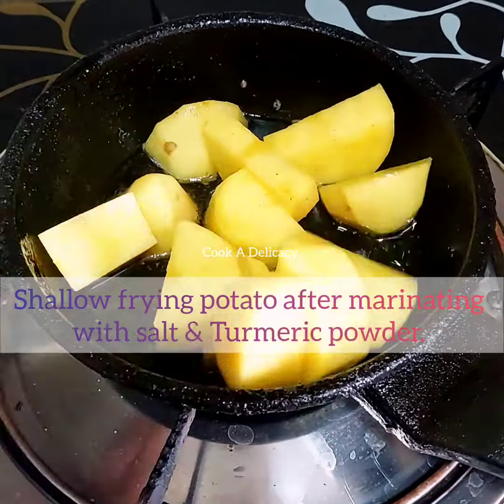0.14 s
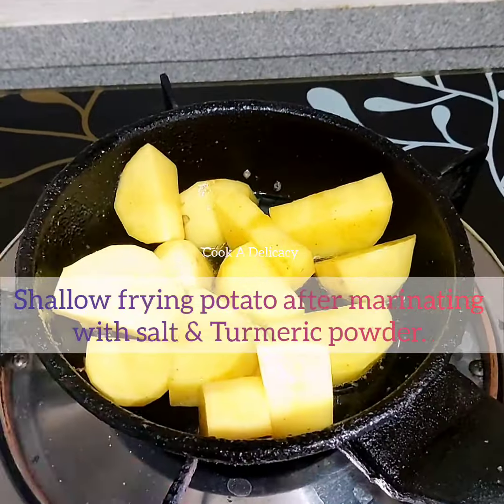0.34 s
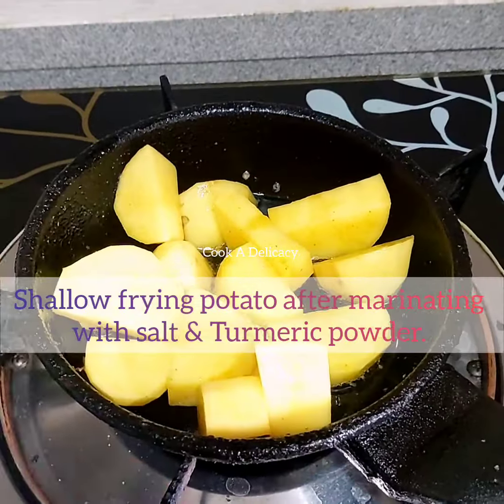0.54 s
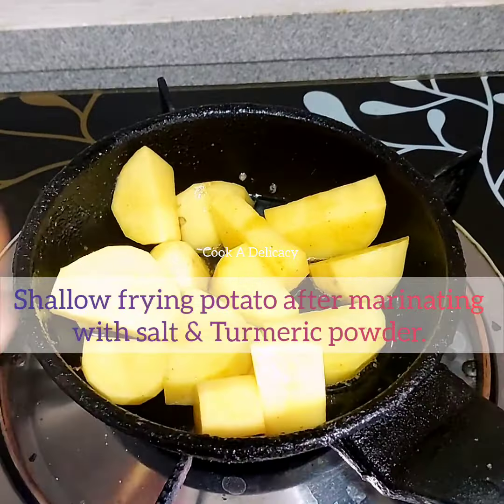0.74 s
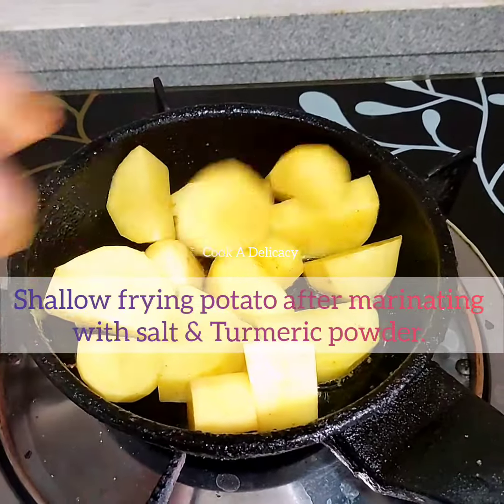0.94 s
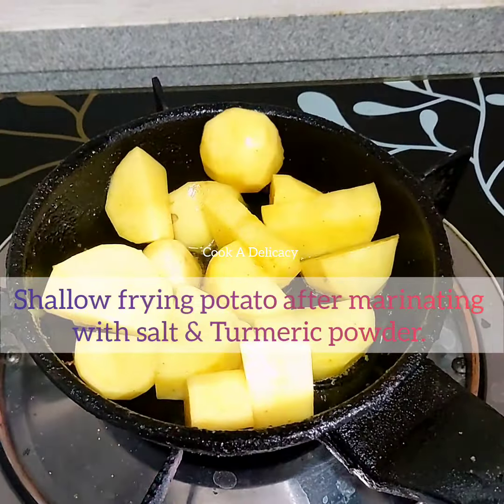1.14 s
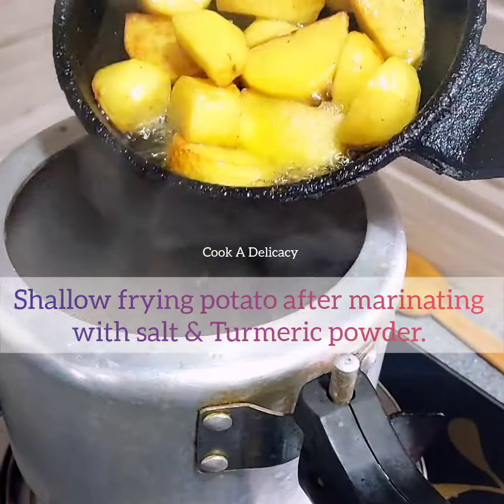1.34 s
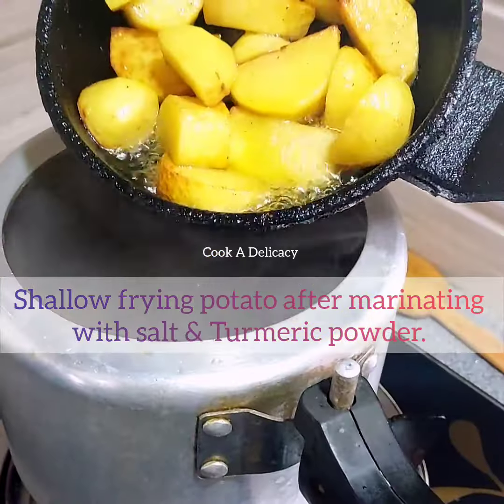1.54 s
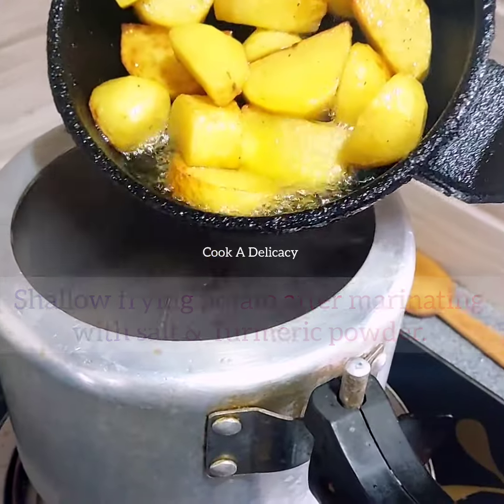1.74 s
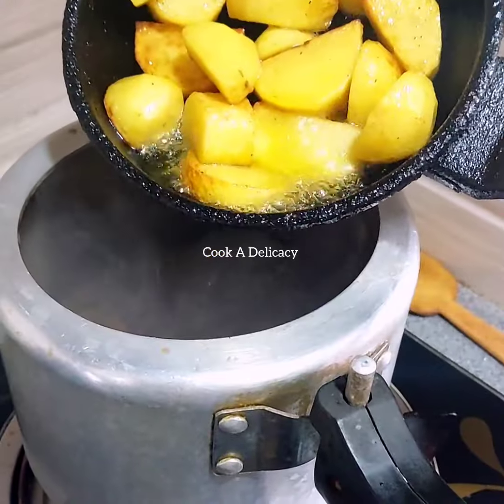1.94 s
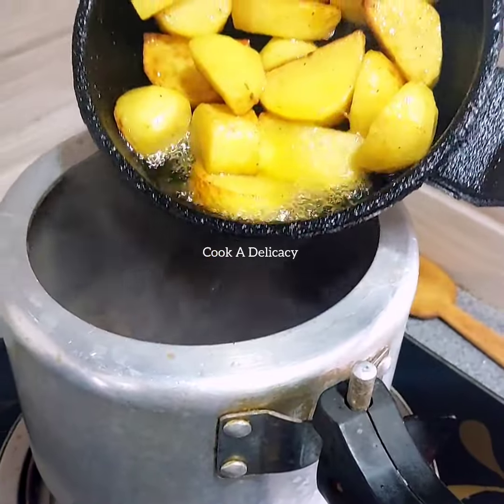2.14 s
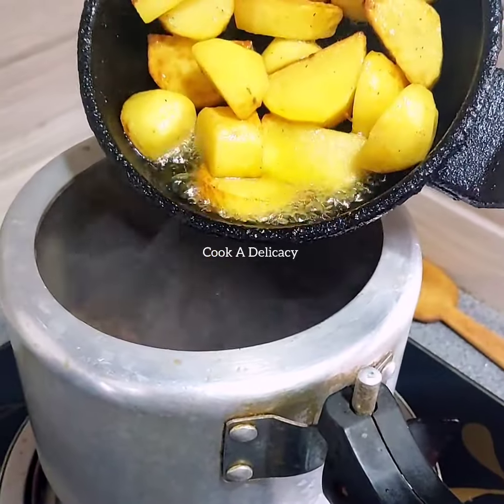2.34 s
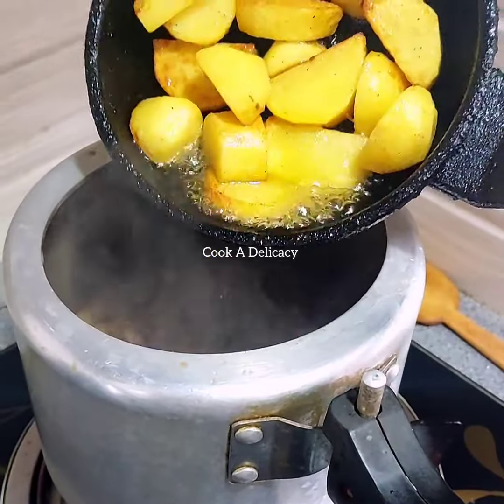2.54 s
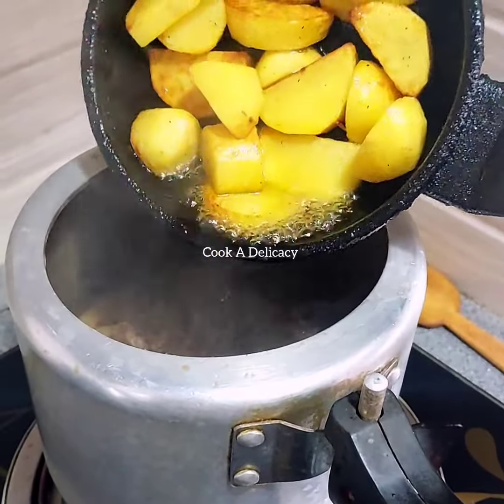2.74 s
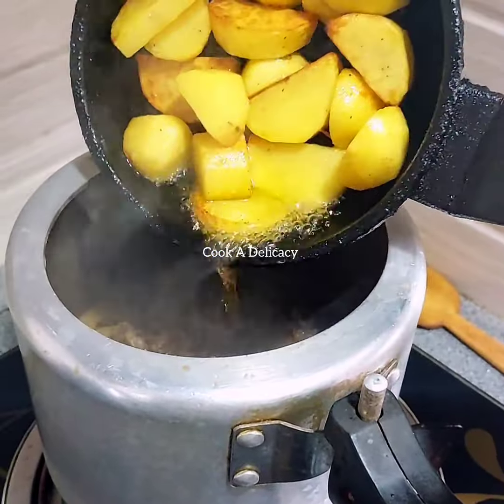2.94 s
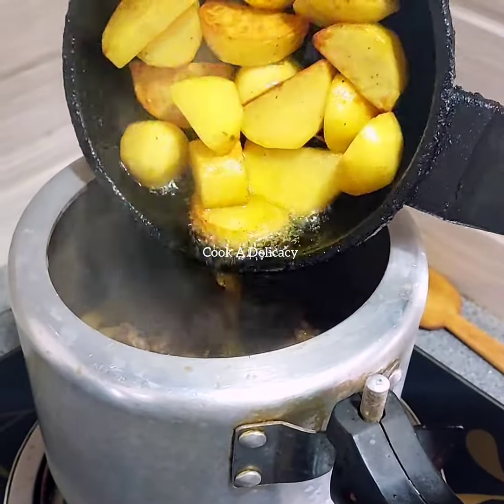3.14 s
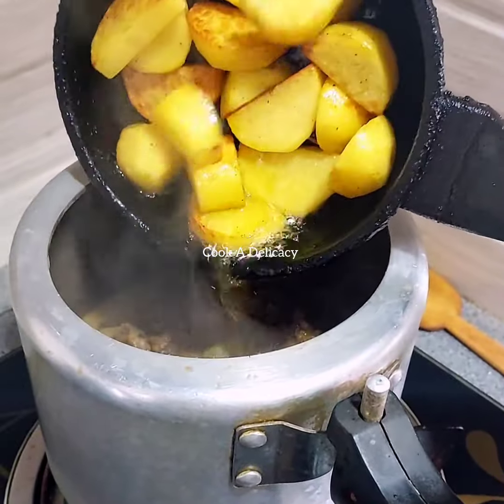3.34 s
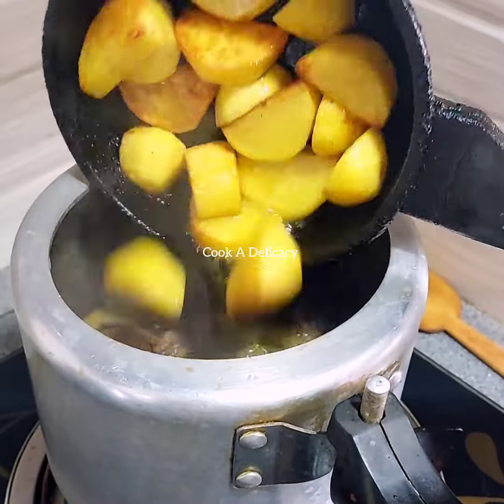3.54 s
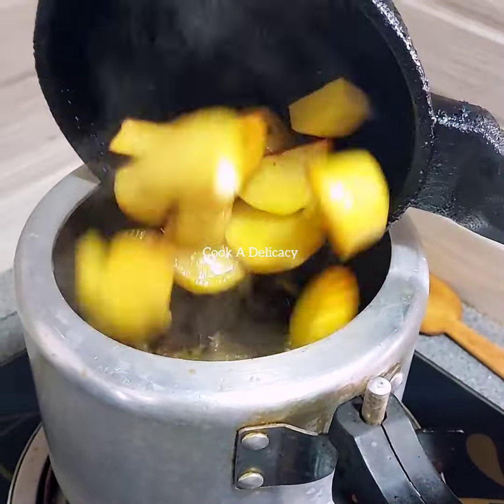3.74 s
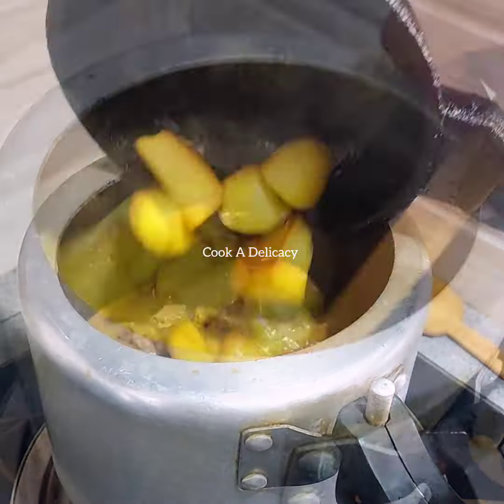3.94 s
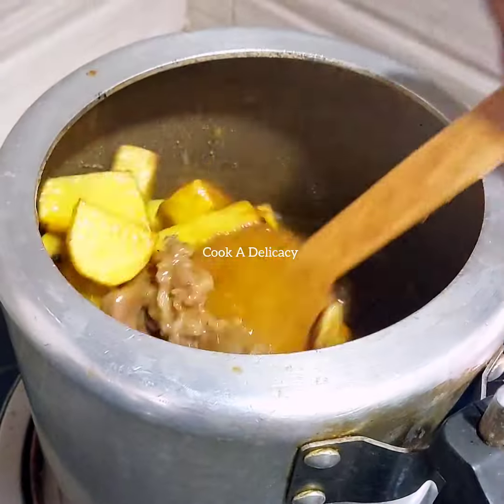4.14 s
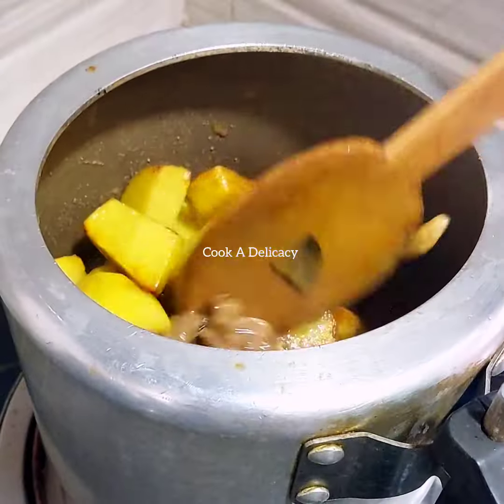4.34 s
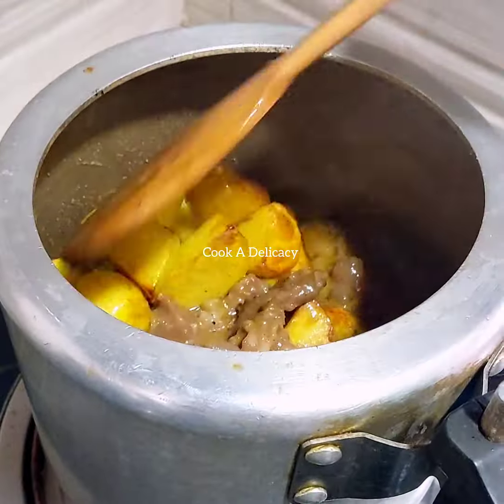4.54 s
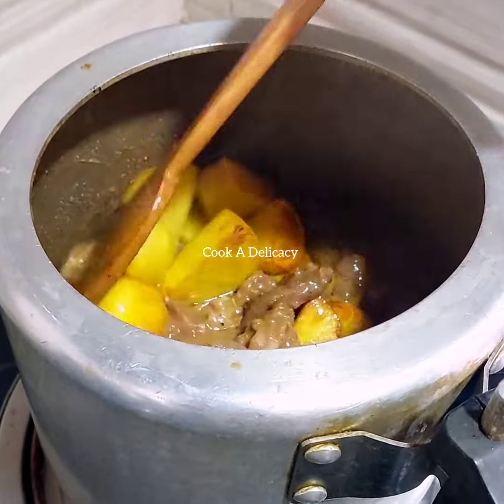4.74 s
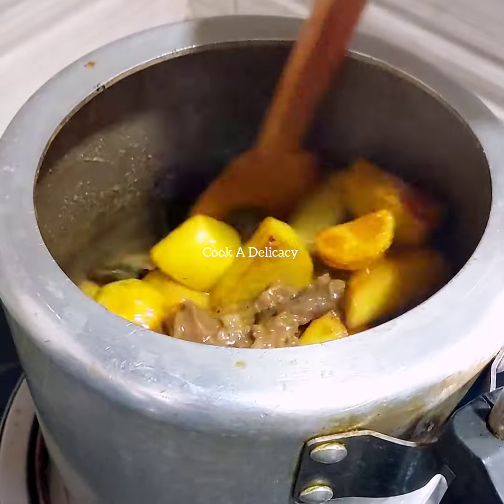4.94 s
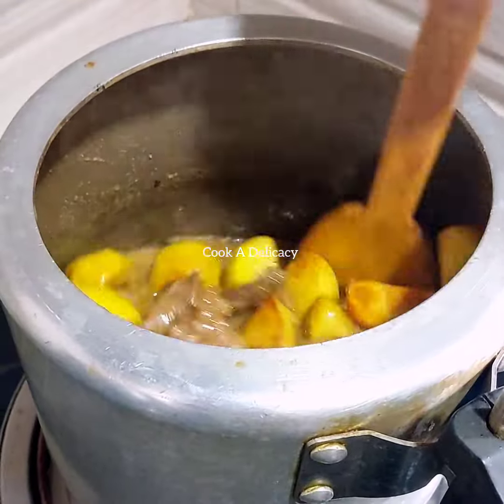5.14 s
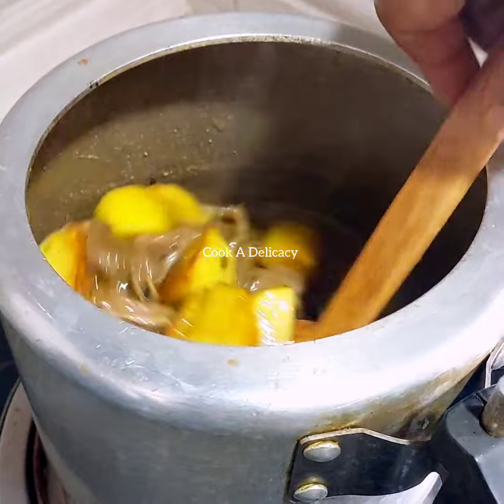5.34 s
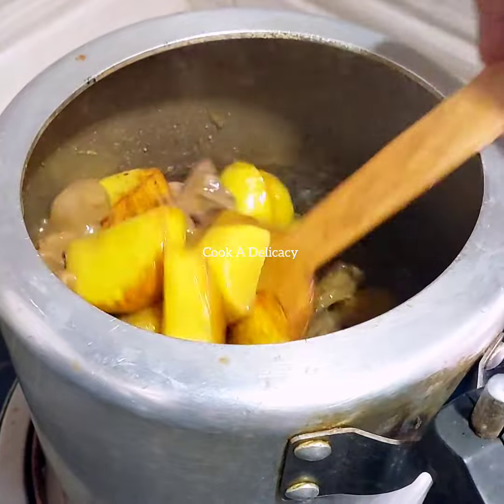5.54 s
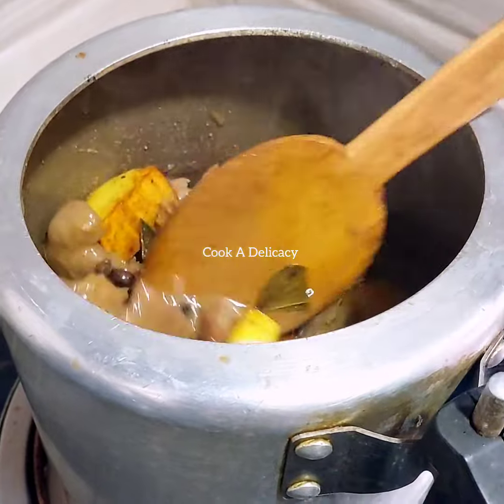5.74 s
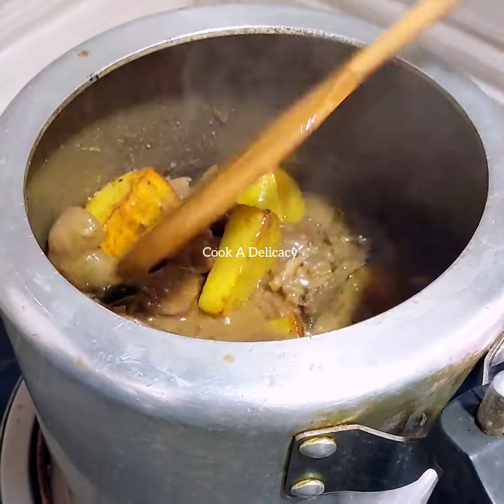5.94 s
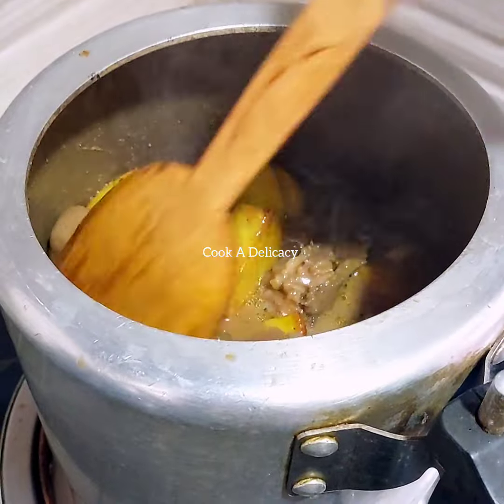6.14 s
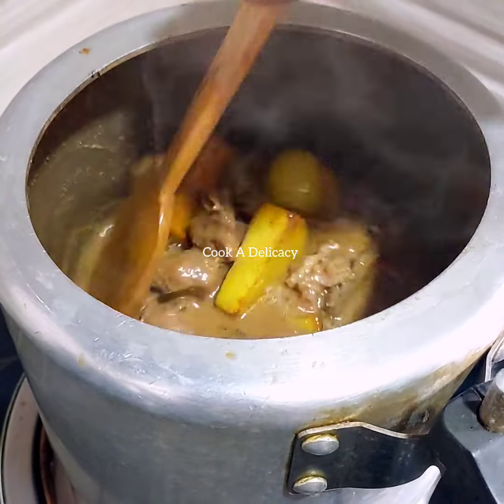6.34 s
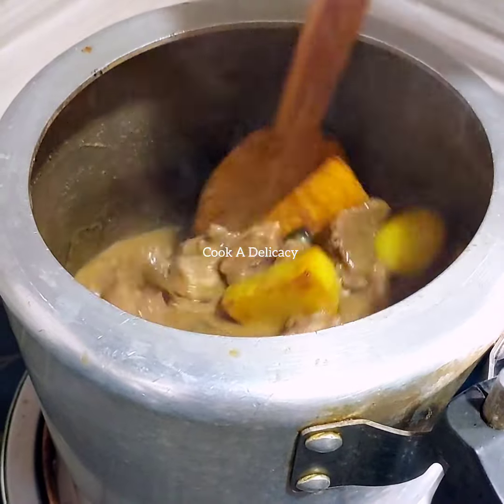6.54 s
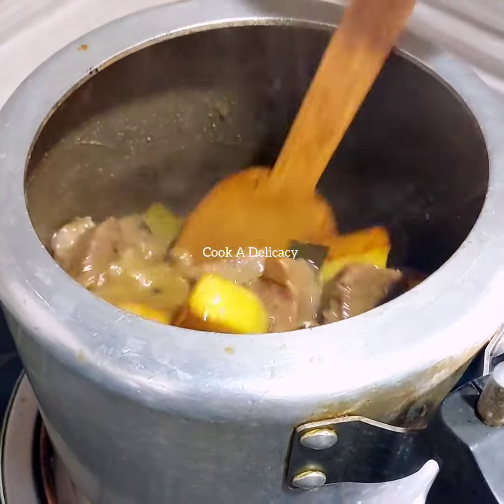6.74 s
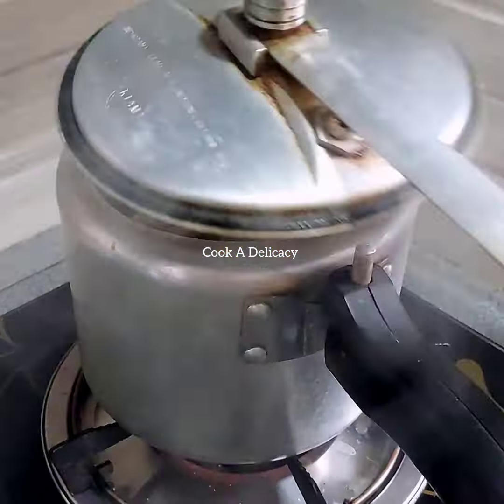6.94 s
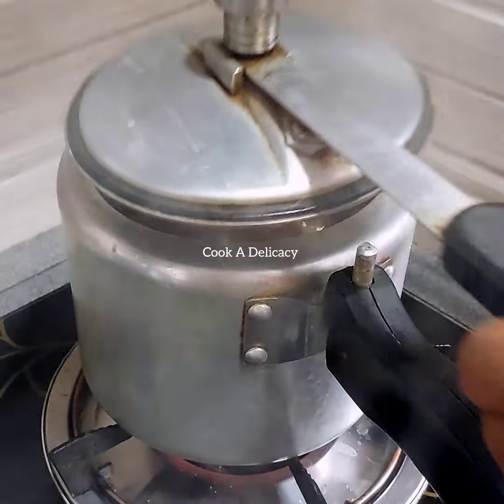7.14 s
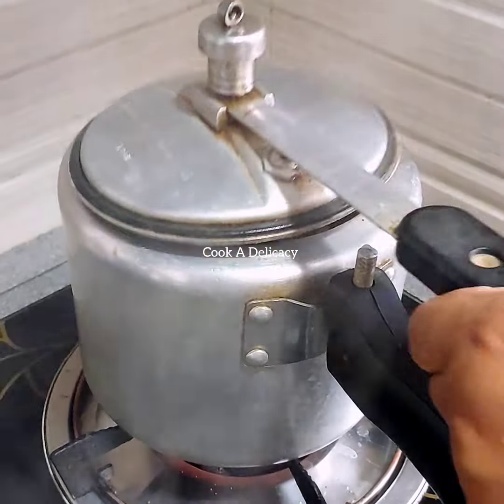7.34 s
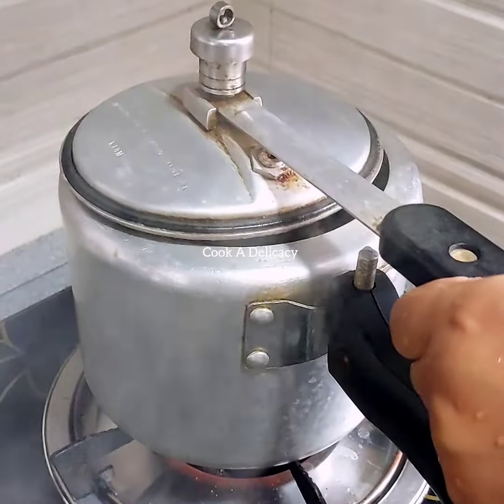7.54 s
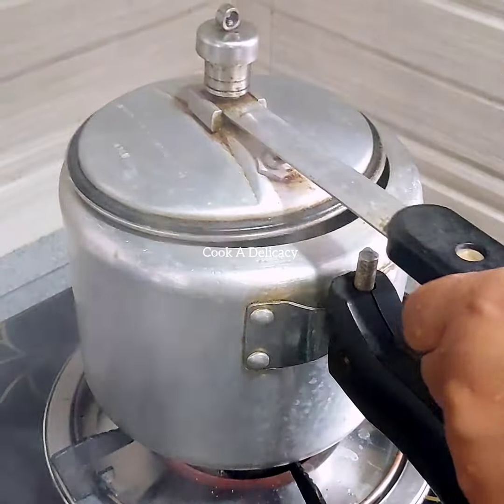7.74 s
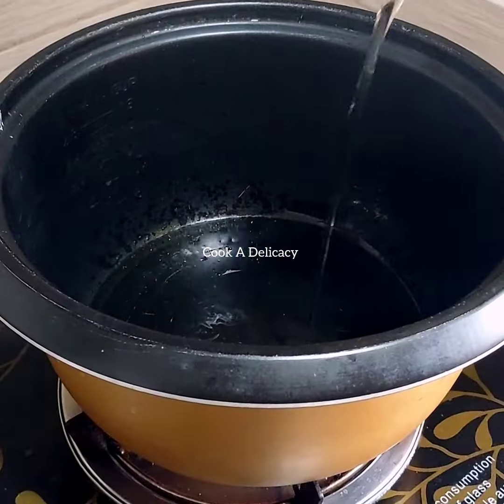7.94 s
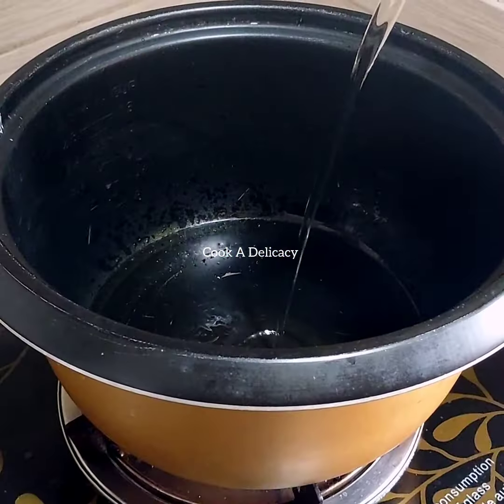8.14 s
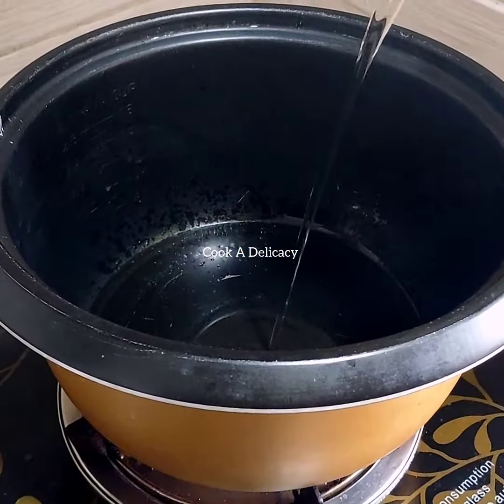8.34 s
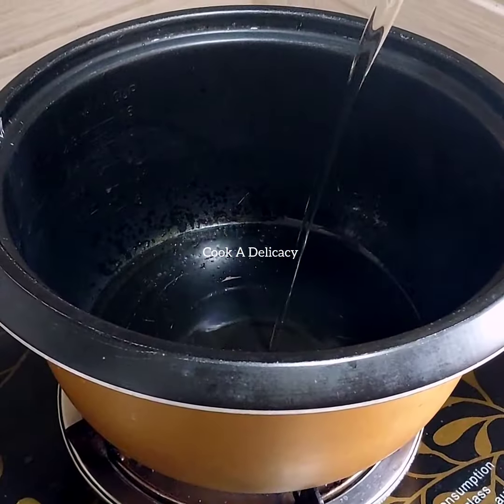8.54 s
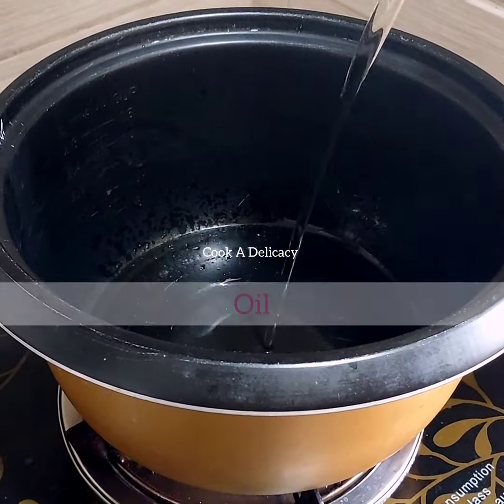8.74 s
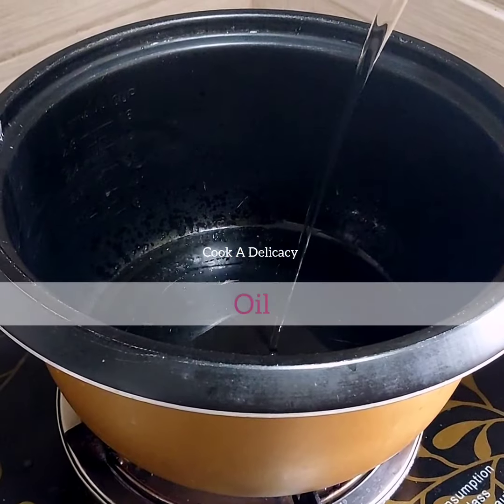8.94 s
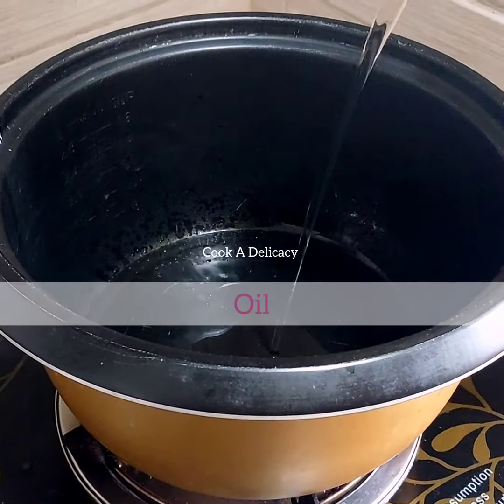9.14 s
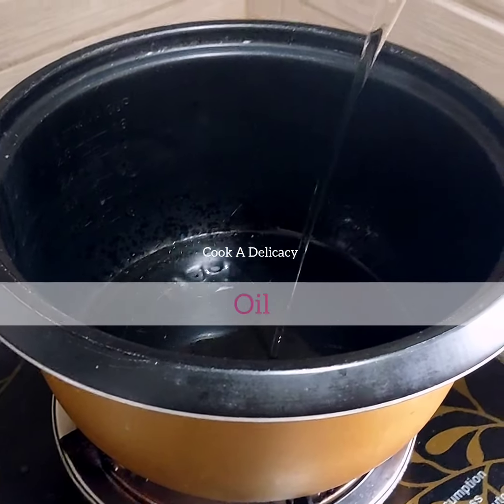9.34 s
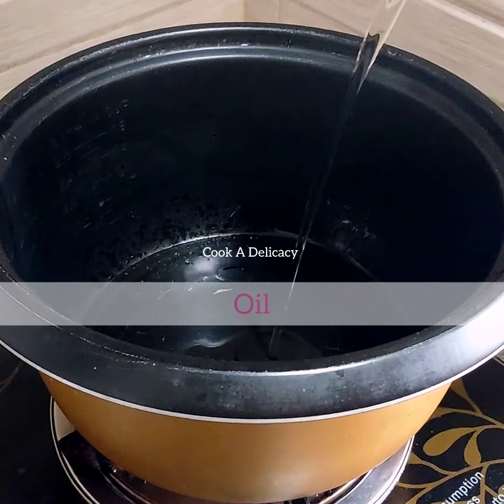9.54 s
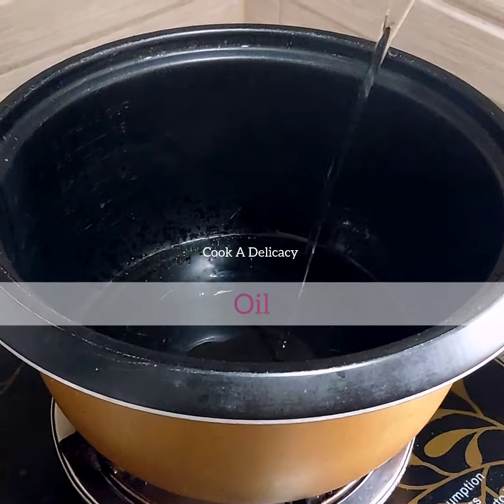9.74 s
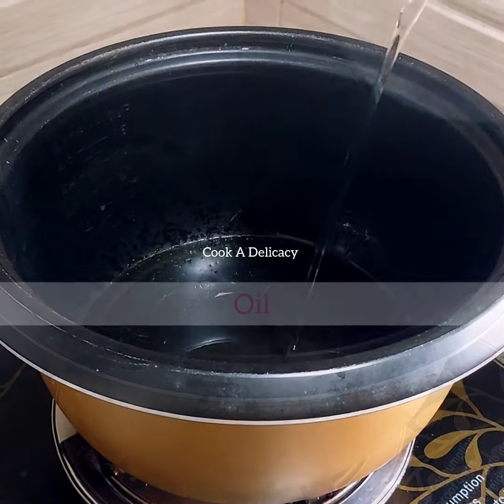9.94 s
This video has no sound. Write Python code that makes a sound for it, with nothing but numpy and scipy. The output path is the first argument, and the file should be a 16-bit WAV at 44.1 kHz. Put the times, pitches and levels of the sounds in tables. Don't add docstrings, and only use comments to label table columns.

```python
import sys
import numpy as np
from scipy import signal
from scipy.fft import rfft, irfft
from scipy.io import wavfile
from scipy.ndimage import uniform_filter1d

SR = 44100
rng = np.random.default_rng(int(sys.argv[2]) if len(sys.argv) > 2 else 0)


def int16_out(signal):
    q = np.round(np.clip(np.atleast_2d(signal).T, -1, 1) * 32767)
    wavfile.write(sys.argv[1], SR, q.astype(np.int16))


def invert_db(level):
    return 10 ** (np.asarray(level, dtype=float) / 20)


N = 440559
TIME = np.arange(N) / SR
PORT_LAG_S, FAN_LAG_S = .00049, .00026


def unit(x):
    return x / np.sqrt(np.mean(x ** 2))


def colour(x, tone):
    hz, db = np.transpose(tone)
    f = np.clip(np.arange(N // 2 + 1) * SR / N, 1, 15000)
    gain = invert_db(np.interp(np.log(f), np.log(hz), db))
    return unit(irfft(rfft(x) * gain, N))


def ring(x, hz, width_hz):
    hz = min(hz, SR / 2.3)
    b, a = signal.iirpeak(hz, hz / width_hz, SR)
    return signal.lfilter(b, a, x)


def walk(rate_hz):
    hold = int(SR / rate_hz)
    steps = np.repeat(rng.standard_normal(N // hold + 1), hold)
    return unit(uniform_filter1d(steps, hold)[:N])


def level_curve(table):
    rows = np.array(table)
    return np.interp(TIME, rows[:, 0], rows[:, 1], -200, -200)


def pan_gain(pan_db):
    return invert_db(np.array([[pan_db], [-pan_db]]) / 2)


def add(out, start_s, burst, pan_db):
    i = int(start_s * SR)
    out[:, i:i + burst.shape[1]] += (burst * pan_gain(pan_db))[:, :N - i]


def two_ports(count, alike_hz, lag_s):
    both = rng.standard_normal(count)
    own = rng.standard_normal((2, count))
    both = np.array([both, np.roll(both, int(lag_s * SR))])
    b, a = signal.butter(1, alike_hz, fs=SR)
    return own + signal.lfilter(b, a, both - 0.67 * own)


def frying(table, tone, lag_s, spread_db, flicker_db, pan_db, body=(), body_db=0, treble_db=(0, 0)):
    size = np.minimum(uniform_filter1d(rng.exponential(size=N), 4), 3.2)
    size = invert_db(spread_db * size + flicker_db * walk(25))
    start_s, end_s = table[0][0], table[-1][0]
    i, j = int(start_s * SR), int(end_s * SR) + 1
    steam = (two_ports(N, 1700, lag_s) * size)[:, i:j]
    if body:
        vessel = 0
        for hz, width_hz, db in body:
            flutter_db = 2.5 * walk(18)[i:j]
            vessel = vessel + invert_db(db + flutter_db) * ring(steam, hz, width_hz)
        steam = unit(steam) + invert_db(body_db) * unit(vessel)
    padded = np.pad(steam, ((0, 0), (i, N - i - steam.shape[1])))
    oil = colour(padded, tone) * np.sqrt((j - i) / N)
    treble = oil - uniform_filter1d(oil, 4)
    lift = invert_db(np.interp(TIME, [start_s, end_s], treble_db))
    oil = oil + (lift - 1) * treble
    return oil * invert_db(level_curve(table)) * pan_gain(pan_db)


def pops(table, ragged_db, rise_s, snap_db, order=3, streak_count=0):
    out, t = np.zeros((2, N)), TIME[:SR // 6]
    for start_s, db, hz, t60_s, share, pan_db in table:
        ragged = invert_db(ragged_db * np.repeat(rng.standard_normal(len(t) // 105), 105))
        puff_shape = ragged * np.minimum(t / rise_s, 1) * invert_db(-60 * t / max(t60_s, .004))
        snap_shape = invert_db(snap_db - 60 * t / 0.0011)
        edge = 1 + np.clip(share, .03, 2.5) / 2
        limits_hz = [hz / edge, min(hz * edge, SR / 2.4)]
        band = signal.butter(order, limits_hz, "band", fs=SR, output="sos")
        noise = two_ports(len(t), 2700, PORT_LAG_S)
        puff = signal.sosfilt(band, noise * (puff_shape + snap_shape))
        if streak_count:
            places = rng.uniform(-1.3, 1.3, streak_count)
            streaks = sum(ring(puff, hz * edge ** u, 70) for u in places)
            puff = unit(puff) + invert_db(3) * unit(streaks)
        add(out, start_s, puff * invert_db(db) / np.abs(puff).max(), pan_db)
    return out


def wet_pops(rows):
    return pops(rows, ragged_db=1.5, rise_s=0.00049, snap_db=2)


def dull_pops(rows):
    return pops(rows, ragged_db=-3.0, rise_s=0.00028, snap_db=18.0)


# time_s, level_db
FAN_LEVEL = [
    [(0, -43.5), (1.45, -41), (1.52, -42.5), (4.2, -43), (6.96, -43.5)],
    [(7.78, -44), (9, -46), (9.99, -45)],
]
# freq_hz, level_db
FAN_SPECTRUM = [(15, -63.5), (40, -18.5), (60, -16.5), (92, -3), (130, -15), (185, -22), (270, -10),
                (400, -16), (900, -21), (1300, -21), (2050, -23.5), (3800, -38), (5600, -43), (16000, -41)]


def fan():
    air = two_ports(N, 1000, FAN_LAG_S)
    whistle = ring(air, 5300, 350)
    air = colour(air + invert_db(4.0) * whistle, FAN_SPECTRUM)
    level_db = np.maximum(level_curve(FAN_LEVEL[0]), level_curve(FAN_LEVEL[1]))
    return air * invert_db(level_db + 1.3 * walk(7.6))


# time_s, level_db
FRY_LEVEL = [(0, -43), (.2, -46.5), (.36, -43), (.95, -43.5), (1.4, -42.5), (1.487, -43)]
# freq_hz, level_db
FRY_SPECTRUM = [(290, -47), (500, -9), (1230, -7), (1340, -9.5), (2260, 0), (2570, -2), (5240, -8.5),
                (8960, -17.5), (12000, -17.5), (16000, -25)]


def pan_frying():
    return frying(FRY_LEVEL, FRY_SPECTRUM, FAN_LAG_S, spread_db=6.5, flicker_db=.8, pan_db=1.0,
                  treble_db=(8, 8))


# start_s, peak_db, pitch_hz
FOOD_THUMPS = [(0.034, -26.5, 335), (.042, -26.5, 228), (.062, -27, 260), (.085, -34, 600),
               (0.906, -27.5, 476), (0.918, -25.5, 300), (.974, -27.5, 403), (1.0, -32, 267),
               (1.082, -26.5, 303), (1.1, -31.5, 496)]


def food_thumps():
    return dull_pops([(*row, .18, 1.3, .6) for row in FOOD_THUMPS])


# start_s, peak_db
PAN_TICKS = [(.1166, -18.5), (.1426, -21), (0.295, -14.5), (0.373, -21), (0.434, -16), (0.5775, -24),
             (.7946, -26), (0.906, -19), (0.92, -9), (0.9776, -16.5), (1.3034, -17), (1.417, -15),
             (5.098, -25), (5.2692, -22), (5.3932, -21.5), (5.4294, -25), (5.4892, -23), (5.695, -29.5)]
# start_s, peak_db
ROAR_CRACKLES = [
    (3.2117, -13),
    (3.2598, -1),
    (3.6691, -13.5),
]
# start_s, peak_db
BOWL_OIL_TICKS = [(7.788, -16), (7.8104, -24), (7.8536, -8.5), (7.793, -24), (7.8193, -8.5), (7.845, -17),
                  (7.867, -20), (7.883, -13.5), (7.887, -6.5), (7.911, -18), (7.927, -21), (7.959, -21.5),
                  (7.988, -19.5), (8.0, -28), (8.038, -21), (8.052, -15.5), (8.1362, -13), (8.204, -22),
                  (8.211, -21), (8.248, -20.5), (8.349, -13.5), (8.514, -32), (8.721, -17), (9.02, -16),
                  (9.111, -16), (9.168, -29), (9.2226, -33), (9.236, -32), (9.329, -21), (7.981, -20),
                  (8.009, -11), (8.014, -9.5), (8.075, -12), (8.107, -15), (8.115, -14.5), (8.1793, -14),
                  (8.231, -9.5), (8.2818, -12), (8.317, -9.5), (8.368, -10.5), (8.4173, -9.5),
                  (8.463, -4.5), (8.5842, -12), (8.635, -11), (8.7347, -11.5), (8.758, -9), (8.817, -10.5),
                  (8.8795, -13), (8.936, -9), (8.9773, -14.5), (9.0334, -7), (9.132, -14), (9.276, -28),
                  (9.4452, -21), (9.6774, -22), (9.8536, -21.5), (9.898, -24)]


def oil_ticks():
    events = PAN_TICKS + BOWL_OIL_TICKS + ROAR_CRACKLES
    rows = [(start_s, db, 11500, .011, 1.4, 4.0) for start_s, db in events]
    return pops(rows, ragged_db=4.0, rise_s=.0003, snap_db=4.0)


# start_s, peak_db, pitch_hz, width_share
PAN_BUBBLES = [(0.297, -27, 5040, 1.2), (.3117, -27, 5210, 1.6), (0.373, -30, 2240, .9),
               (0.488, -22.5, 3700, 0.31), (.4877, -27, 2300, 0.69), (0.5782, -16.5, 3260, 1.8),
               (.6463, -24.5, 2600, 1.05), (0.6602, -24, 2300, 0.94), (0.701, -22, 4360, 0.91),
               (0.724, -27, 5070, 0.35), (0.723, -25, 2400, 0.74), (.74, -29, 3100, .4),
               (0.9032, -21.5, 1800, 1.7), (0.9207, -16.5, 4500, 2.6), (0.9758, -29, 2020, .9),
               (1.048, -20.5, 2640, 0.89)]


def pan_bubbles():
    rows = [(start_s, db, hz, .023, share, -2.5) for start_s, db, hz, share in PAN_BUBBLES]
    return wet_pops(rows)


# time_s, level_db
SONG_LEVEL = [(.93, -66), (1.0, -43.5), (1.487, -44.5)]
# freq_hz, width_hz, level_db
PAN_MODES = [(1658, 30, 11), (2400, 40, 1), (2900, 60, 0)]


def pan_song():
    return frying(SONG_LEVEL, FRY_SPECTRUM, FAN_LAG_S, spread_db=3.0, flicker_db=1.0, pan_db=1.5,
                  body=PAN_MODES, body_db=12)


# time_s, level_db
SIZZLE_LEVEL = [(1.487, -30.5), (3.1, -33.5), (3.9, -31), (4.1, -39.5), (4.3, -69)]
# freq_hz, level_db
SIZZLE_SPECTRUM = [(290, -24), (500, -9.5), (553, -12.5), (1130, -5.5), (1250, -5), (1460, -5.5),
                   (3980, -1.5), (9220, -3.5), (11500, -0.5), (15100, -2.5), (16000, -49.5)]


def oil_sizzle():
    return frying(SIZZLE_LEVEL, SIZZLE_SPECTRUM, FAN_LAG_S, spread_db=4.5, flicker_db=0.6, pan_db=2.5,
                  treble_db=(-2, 3))


# time_s, level_db
ROAR_LEVEL = [(3.03, -49), (3.09, -30.5), (3.25, -26.5), (3.5, -22.5), (3.82, -24), (4.02, -31.5),
              (4.13, -40.5), (4.2, -50.5), (4.3, -61)]
# freq_hz, level_db
ROAR_SPECTRUM = [(180, -37), (300, -22.5), (470, -11), (603, -2.5), (978, -7), (1410, -9.5), (2070, -17),
                 (2400, -8), (3600, -12.5), (3950, -10.5), (8090, -8), (9090, -10.5), (11900, -7),
                 (16000, -14)]
# freq_hz, width_hz, level_db
POT_AIR_MODES = [(536, 30, -9), (606, 50, -6), (772, 30, -9), (1220, 46, -13), (1410, 90, -8),
                 (1920, 47, -14), (2390, 220, -6), (2850, 120, -5), (3150, 87, -10), (3910, 150, -1),
                 (4600, 160, -8), (5380, 160, -4), (8200, 300, -11), (6160, 90, -10)]


def gravy_roar():
    return frying(ROAR_LEVEL, ROAR_SPECTRUM, PORT_LAG_S, spread_db=4.5, flicker_db=.4, pan_db=2.5,
                  body=POT_AIR_MODES, body_db=-4.5, treble_db=(5.5, .1))


# start_s, peak_db, pitch_hz, width_share, left_minus_right_db
GRAVY_SLOPS = [(3.1119, -14.5, 2320, 1.4, -1), (5.103, -31, 11000, .8, 6), (5.112, -39, 11500, .7, 6),
               (5.247, -36, 12500, .5, 5), (5.257, -30, 12500, .5, 5), (5.312, -29, 10500, 0.96, 4),
               (5.395, -31, 10600, 0.22, 4), (5.698, -32, 13500, 0.49, 0), (5.708, -38, 13000, .5, 4),
               (4.2036, -28, 2560, 0.7, 0), (4.66, -37, 4330, 1.4, -1), (5.0988, -31, 6300, 1.8, 10),
               (5.177, -28, 6450, 0.82, 12), (5.2148, -28.5, 6000, 0.49, 6), (5.27, -21, 4930, 2, 2),
               (5.3191, -15, 3580, 0.46, -3), (5.3206, -12, 3000, 0.19, 7), (5.391, -24, 2760, 0.54, 2),
               (5.4288, -21, 6400, 1.2, 0), (5.49, -28.5, 2400, 0.33, 0), (5.5468, -30.5, 4000, 0.83, 7),
               (5.612, -41, 4000, 0.55, 2), (5.637, -39, 5610, .6, 3.5), (5.735, -48, 3800, .6, -4),
               (5.5925, -34, 3670, 0.36, 5), (5.7073, -30, 3750, 0.44, 5), (6.51, -36, 3740, 1.4, 6),
               (6.748, -32.5, 3000, 0.83, 8), (6.513, -37, 12500, .5, 10), (6.522, -35, 13000, 0.35, 7),
               (6.531, -35, 12000, .6, 5), (6.751, -28, 11600, 0.68, 7), (6.76, -26, 9000, 1.6, 5),
               (6.38, -45, 7000, .4, 2), (6.91, -48, 6200, .3, 5), (6.935, -40.5, 6050, 0.84, -1.5),
               (8.012, -19.5, 2600, 3.3, 2.5), (8.606, -22.5, 2010, 0.8, 2), (9.446, -26, 2320, 2.8, -1)]


def gravy_slops():
    rows = [(start_s, db, hz, .05, share, pan_db) for start_s, db, hz, share, pan_db in GRAVY_SLOPS]
    return wet_pops(rows)


# start_s, peak_db, pitch_hz, t60_s, left_minus_right_db
WALL_SLAPS = [(3.114, -39, 1140, 0.035, 1), (4.984, -26, 1220, 0.08, 2), (5.214, -29.5, 1280, 0.073, 4.5),
              (5.268, -29.5, 1800, 0.1, 1), (5.391, -30, 1200, 0.12, 2), (5.429, -17.5, 1010, 0.031, 4),
              (5.455, -26, 1750, 0.15, 7), (5.451, -29.5, 317, 0.32, -1), (5.489, -20, 830, 0.025, 3.5),
              (5.582, -29.5, 1335, 0.14, 1), (6.1, -33, 2750, 0.4, -3.5), (6.474, -18, 1157, 0.029, -0.5),
              (6.49, -42.5, 1970, 0.45, -19), (4.629, -24, 1206, .08, 1), (4.629, -29, 1440, 0.069, -4),
              (6.21, -42, 2230, 0.29, 0), (6.232, -39, 2450, 0.19, -2.5), (9.03, -37, 1500, 0.23, 6),
              (9.27, -41, 1450, 0.34, 2), (4.63, -32, 2650, 0.17, -2), (8.515, -35, 1850, 0.19, -15),
              (5.093, -37, 1220, 0.089, 9), (5.176, -38, 820, .05, 6), (5.548, -25.5, 606, 0.1, 2),
              (5.663, -42, 802, 0.054, 2), (5.696, -38, 1290, .06, 0), (6.567, -34, 1270, 0.077, -7),
              (6.735, -56, 684, 0.091, 2), (6.757, -34, 634, 0.032, 3.5), (6.385, -37.5, 350, 0.026, 0),
              (6.76, -33, 1266, 0.11, 3.5), (6.819, -35.5, 1270, 0.046, 7), (6.865, -34, 685, 0.063, 4),
              (6.894, -40, 1285, 0.058, -10), (8.247, -31.5, 2520, 0.19, 3), ]


def wall_slaps():
    rows = [(start_s, db, hz, t60_s, 0.086 + 0.01 / t60_s, pan_db)
            for start_s, db, hz, t60_s, pan_db in WALL_SLAPS]
    return dull_pops(rows)


# start_s, length_s, level_db
SPOON_STROKES = [
    (4.602, 0.36, -44.5),
    (5.005, 0.7, -37.5),
    (5.808, 0.78, -70),
    (6.1, 0.15, -37.5),
    (6.448, 0.25, -36),
    (6.686, 0.16, -38),
]
# freq_hz, level_db
SIMMER_SPECTRUM = [(240, -46), (400, -2.5), (474, -26), (607, -0.5), (1330, -13.5), (1600, -11),
                   (1990, -7.5), (2750, -16.5), (16000, -25.5)]
# freq_hz, width_hz, level_db
SCRAPE_MODES = [(590, 10, 8), (1220, 14, 16), (1400, 44, -19), (1860, 82, -6.5)]


def spoon_strokes():
    rows = []
    for start_s, length_s, db in SPOON_STROKES:
        rows.append((start_s, db - 8.5))
        rows.append((start_s + 0.37 * length_s, db))
        rows.append((start_s + 1.1 * length_s, db - 9))
    return frying(sorted(rows), SIMMER_SPECTRUM, FAN_LAG_S, spread_db=4.0, flicker_db=2.0, pan_db=1.5,
                  body=SCRAPE_MODES, body_db=-11)


# start_s, peak_db, low_mode_db, crack_db, left_minus_right_db
SPOON_KNOCKS = [
    (4.627, -21.5, 9, -8, 1),
    (5.489, -16.5, 37, -17.5, 10),
    (5.503, -19.5, 23.5, -32, 4),
    (6.096, -11, 1.5, 1, -5.5),
    (6.473, -27, -12.5, 2.5, 0),
]
# after_blow_s, mute_db
SPOON_SETTLE = [
    (.035, -6),
    (.010, -24),
    (.021, -14),
    (.026, -8),
    (.01, -10),
]
# freq_hz, level_db, t60_s
POT_MODES = [(330, -34, .06), (604, -7, .13), (640, -15, .12), (760, -22, .06), (1215, -17, .14),
             (1379, -1, .26), (1402, 0, .26), (1452, -17, .1), (1723, -24, .08), (2654, -18, .1),
             (2790, -17, .09), (3320, -22, .05), (4340, -27, .07), (4950, -27, .04)]


def spoon_knocks():
    out, t = np.zeros((2, N)), TIME[:SR // 2]
    ports_s = np.array([t, np.maximum(t - .00021, 0)])
    for (start_s, db, low_db, crack_db, pan_db), (settle_s, settle_db) in zip(SPOON_KNOCKS, SPOON_SETTLE):
        mute = invert_db(settle_db * np.clip((t - settle_s) / .005, 0, 1))
        ring_share = max(2.0 + .05 * db, .3)
        detune = 1 + .0005 * rng.standard_normal(len(POT_MODES))
        modes = 0
        for (hz, mode_db, t60_s), d in zip(POT_MODES, detune):
            decay_db = 60 * t / (ring_share * min(t60_s, .4))
            level = invert_db(mode_db + low_db * (hz < 1000) - decay_db)
            modes = modes + level * np.sin(2 * np.pi * hz * d * ports_s)
        modes = modes * mute * np.minimum(t / .0008, 1)
        crack = ring(ring(two_ports(len(t), 2000, PORT_LAG_S), 3190, 2600), 3100, 2600)
        crack = crack * (invert_db(-60 * t / 0.034) + invert_db(-14 - 60 * t / 0.09))
        knock = modes / np.abs(modes).max() + invert_db(crack_db) * crack / np.abs(crack).max()
        add(out, start_s, invert_db(db) * knock, pan_db)
    return out


# freq_hz, width_hz, level_db
BOWL_MODES = [(1850, 27, 9.5), (3740, 6.3, 19.5), (4820, 226, 5), (5060, 37, -34), (5210, 28, -26),
              (5650, 76, -16), (6090, 370, -63)]
# start_s, peak_db, pitch_hz, t60_s
STRONG_SPITS = [(7.7925, -24, 4860, 0.23), (7.8197, -28, 4810, 0.098), (7.887, -23, 7550, 0.16),
                (8.058, -19, 6200, 0.1), (8.099, -27, 3800, 0.13), (8.1147, -22, 4620, 0.12),
                (8.201, -19.5, 6300, 0.027), (8.2298, -31, 6170, 0.073), (8.2465, -13.5, 6150, 0.066),
                (8.2834, -18.5, 5800, 0.082), (8.315, -12.5, 6700, 0.057), (8.35, -20.5, 6250, .15),
                (8.394, -22.5, 4760, 0.066), (8.4163, -21.5, 5280, 0.15), (8.499, -20, 5960, 0.2),
                (8.606, -17, 5270, 0.1), (8.673, -25, 4000, 0.12), (8.7198, -14, 6470, 0.077),
                (8.776, -22.5, 5650, 0.1), (8.813, -25, 4920, 0.11), (8.879, -16, 5870, 0.068),
                (8.9124, -22.5, 4500, 0.064), (8.969, -19.5, 4520, 0.046), (9.024, -18.5, 5770, 0.19),
                (9.051, -19, 5520, 0.089), (9.134, -19, 5060, 0.046), (9.167, -16.5, 4820, 0.1),
                (9.235, -18.5, 7340, 0.037), (9.2744, -26, 4980, 0.095), (9.329, -23, 8300, 0.16)]
# start_s, peak_db, pitch_hz
WEAK_SPITS = [(7.8272, -19, 3580), (7.846, -30, 3530), (7.971, -28, 6000), (8.267, -22, 4600),
              (8.299, -28, 6000), (8.36, -27, 4730), (8.432, -21, 6080), (8.4628, -28, 6800),
              (8.515, -25, 6760), (8.545, -29, 4350), (8.5845, -36, 5170), (8.612, -29, 3900),
              (8.645, -22, 6600), (8.792, -29, 6450), (8.875, -27, 4400), (8.935, -31, 6700),
              (9.0121, -42, 5750), (9.075, -23, 5130), (9.129, -24, 6560), (9.168, -16.5, 6080),
              (9.201, -39, 4850), (9.292, -25, 4770), (9.338, -25, 5770)]
# start_s, peak_db, pitch_hz
LAST_DROPS = [(9.265, -24, 7030), (9.3595, -23, 4780), (9.375, -23, 4620), (9.448, -21.5, 6750),
              (9.5703, -35, 6090), (9.593, -25.5, 6090), (9.682, -27, 7550), (9.723, -29, 4600),
              (9.748, -22.5, 3320), (9.753, -19, 6620), (9.8313, -32.5, 6650), (9.87, -33, 6340),
              (9.898, -23.5, 4550), (9.9574, -32, 6250), (9.976, -28, 4870)]


def bowl_spits():
    weak = [(*row, 0.059) for row in LAST_DROPS + WEAK_SPITS]
    rows = [(*row, .2, 2.5) for row in STRONG_SPITS + weak]
    spits = pops(rows, ragged_db=0.5, rise_s=0.0016, snap_db=8.5, order=2, streak_count=4)
    bowl = sum(invert_db(db) * ring(spits, hz, width_hz + 60) for hz, width_hz, db in BOWL_MODES)
    return spits + invert_db(-10) * bowl


# time_s, level_db
HISS_LEVEL = [(7.78, -29.5), (7.93, -32.5), (8.0, -38), (8.45, -31.5), (8.8, -34.5), (9.0, -32.5),
              (9.2, -35.5), (9.4, -38.5), (9.52, -41), (9.99, -40.5)]
# freq_hz, level_db
HISS_SPECTRUM = [(470, -55), (800, 1.5), (1290, -4), (1880, -2.5), (2210, -7), (3100, -5.5), (3690, -0.5),
                 (4290, 2.5), (4740, -0.5), (6330, 2.5), (8880, 0), (15000, -6), (16000, -31)]


def bowl_hiss(spits):
    hiss = frying(HISS_LEVEL, HISS_SPECTRUM, PORT_LAG_S, spread_db=7.0, flicker_db=2.5, pan_db=1.5,
                  body=BOWL_MODES, body_db=-13.5, treble_db=(3, -4))
    busy = uniform_filter1d(np.abs(spits).sum(axis=0), SR // 60)
    steady = uniform_filter1d(hiss, size=14)
    swell = np.sqrt(.4 + np.minimum(busy / busy.max() * 3, 1))
    return invert_db(-1.5) * steady + (hiss - steady) * swell


def kitchen(x):
    t60_s, wet_db, top_hz = 0.13, -9.5, 5050
    t = TIME[:SR // 3]
    tails = rng.standard_normal((2, len(t))) * invert_db(-60 * t / t60_s) * np.minimum(t / 0.00083, 1)
    b, a = signal.butter(1, top_hz, fs=SR)
    tails = unit(signal.lfilter(b, a, tails)) / np.sqrt(len(t))
    return x + invert_db(wet_db) * signal.fftconvolve(x, tails, axes=1)[:, :N]


def scene():
    spits = bowl_spits()
    beds = fan() + pan_frying() + pan_song() + oil_sizzle() + gravy_roar() + spoon_strokes()
    beds = beds + bowl_hiss(spits)
    bursts = food_thumps() + oil_ticks() + pan_bubbles() + gravy_slops() + wall_slaps()
    return beds + kitchen(bursts + spoon_knocks() + spits)


def low_pass(x):
    return signal.sosfilt(signal.butter(12, 16960, fs=SR, output="sos"), x)


# freq_hz, width_hz, share_removed
PORT_DIP = (9100, 2000, .4)


def record(dry):
    cut_out_s, cut_in_s = 6.948, 7.787
    blip_gap_s, dip_s, dip_half_s = 7.7905, .346, .008
    hz, width_hz, share = PORT_DIP
    gate = np.clip(np.maximum(cut_out_s - TIME, TIME - cut_in_s) / .0015, 0, 1)
    gate = gate * np.clip(np.abs(TIME - blip_gap_s) / .0005 - 2, .05, 1)
    gate = gate * np.clip(np.abs(TIME - dip_s) / dip_half_s, .2, 1)
    heard = dry - share * ring(dry, hz, width_hz)
    top_cut = signal.ellip(8, .2, 32, 15800, fs=SR, output="sos")
    mix = signal.sosfilt(top_cut, heard) * gate
    return low_pass(mix)


dry = scene()
out = record(dry)
int16_out(out)
```